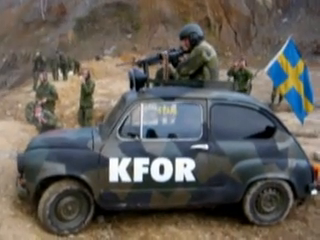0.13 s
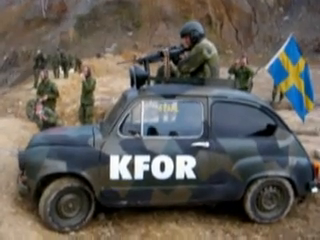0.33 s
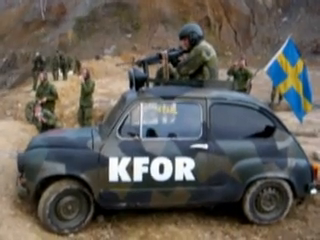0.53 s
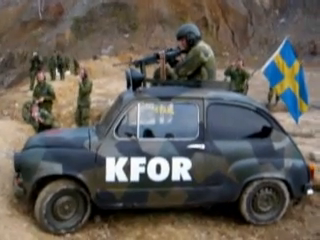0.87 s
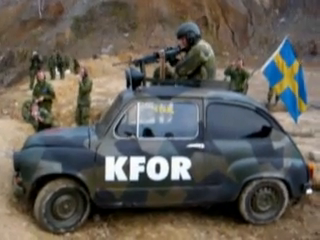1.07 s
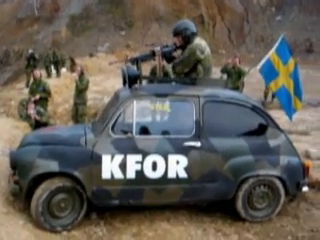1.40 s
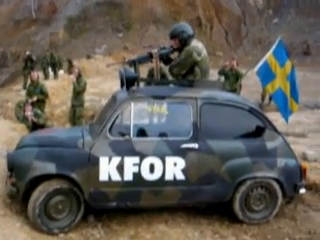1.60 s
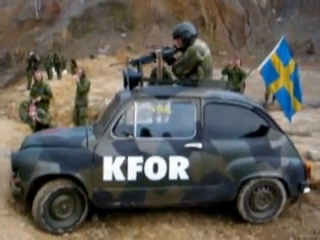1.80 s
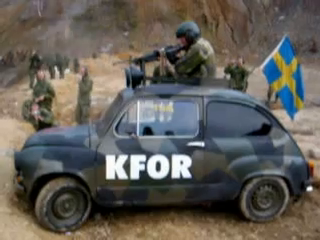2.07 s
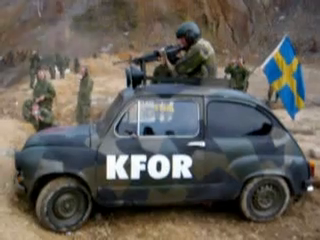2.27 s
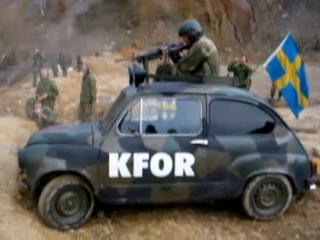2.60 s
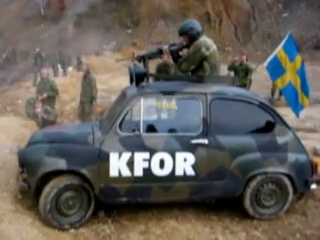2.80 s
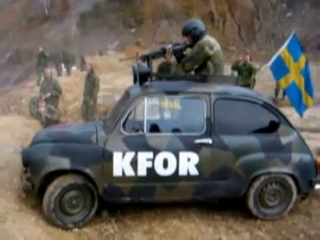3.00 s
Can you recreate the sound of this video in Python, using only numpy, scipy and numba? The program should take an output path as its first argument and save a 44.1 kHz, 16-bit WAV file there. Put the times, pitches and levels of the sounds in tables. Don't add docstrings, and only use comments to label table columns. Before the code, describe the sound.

Machine gun on a small car in a quarry: the echo of an earlier burst rolls and dulls, the bolt clatters home, then rapid close shots overload a pocket camera microphone until the end.

```python
import sys
import numpy as np
from scipy import signal
from scipy.io import wavfile
from scipy.ndimage import uniform_filter1d
from numba import njit

SR = 44100
rng = np.random.default_rng(int(sys.argv[2]) if len(sys.argv) > 2 else 0)


def generate_wav(sig):
    pcm = np.round(np.clip(np.atleast_2d(sig).T, -1, 1) * 32767).astype(np.int16)
    wavfile.write(sys.argv[1], SR, pcm)


def makeup_ratio(level_db):
    decades = np.asarray(level_db, float) / 20
    return 10 ** decades


N = 138474

# (time [s], blast level [dB], upward bias swing afterwards [rails])
SHOTS = [(2.0190, -2, 3.5), (2.0868, 1.5, 4.26), (2.1551, 3, 4.26), (2.2218, -1.5, 3.1),
         (2.2909, -1.5, 3.74), (2.3588, -6.5, 2.5), (2.4271, -4, 3.5), (2.4950, -1.5, 3.85),
         (2.5650, -2.5, 3.33), (2.6347, -5.5, 3.2), (2.7057, -2.5, 3.93), (2.7749, -2, 3.74),
         (2.8446, -2.5, 4.36), (2.9149, -4, 3.65), (2.9838, -2, 3.94), (3.0486, -3.5, 3.48),
         (3.1158, -2, 1.6)]
# (pitch [Hz], level [dB], time to fall 60 dB [s])
CAR_PANELS = [(158.6, 5, 0.13), (201, 8, 0.075), (257.8, 3.5, 0.065), (311.5, 5.5, 0.19), (396, 6, 0.11),
              (528, 4, 0.16), (658, 7.5, 0.12), (820, 6, 0.093), (902.3, 3, 0.12), (1015, -3, .1),
              (1327, -1, 0.08)]
# (delay [s], level [dB], length [s], polarity [+-])
BLAST_ECHOES = [(0, 16, .0003, -0.89), (.0003, 20, 0.00083, 1), (.0017, 23, 0.00059, 1),
                (.0037, 26, 0.00064, 1), (.0052, 25, 0.00097, 1), (.0074, 15.5, 0.00068, 1),
                (0.0107, 19, 0.00039, 0.87), (.013, 16.5, 0.0019, 1), (0.0169, 9.5, 0.0011, 1),
                (0.0212, 11.5, .0007, -1), (0.0224, 13, 0.00081, -1), (0.0251, 11.5, .0008, -1),
                (.03, 15.5, 0.00066, -1), (.0333, 8, 0.00052, -1), (0.0344, 6, 0.00059, -1),
                (.0408, 4.5, 0.0011, -1), (0.0454, -0.5, 0.0013, -1)]
# (time [s], level [dB])
BOLT_KNOCKS = [
    (1.969, -14.5),
    (1.9756, -8),
    (1.9899, -6),
    (2, -18),
    (2.0091, -2),
    (2.013, -19),
    (2.0135, -13),
]
# (pitch [Hz], width [Hz], level [dB])
BOLT_RINGS = [
    (2440, 1000, 5),
    (4000, 1000, -10),
    (5330, 940, 11),
]
# (time [s], level [dB], treble lost in air at 4 kHz [dB])
ROLLING_ECHO = [(0, -29.5, -8.5), (.12, -30, -9.5), (0.302, -25.5, -8.5), (.45, -20.5, -6),
                (.65, -19.5, -4.5), (.8, -17.5, 0), (.9, -20.5, -4), (1.2, -21.5, 3), (1.5, -23, 7.5),
                (1.749, -23.5, 14.5), (1.958, -28.5, 17.5), (2.098, -6, 9)]
# (pitch [Hz], level per Hz [dB])
ROLL_COLOUR = [(45, -14), (100, -4.5), (170, -2.5), (600, -4.5), (1400, -13), (2600, -12), (2950, -19.5),
               (6000, -38.5)]
# (time [s], pitch [Hz])
HOLLOW_PITCH = [(0, 822), (.5, 785), (.85, 734), (1.4, 575), (2, 525)]
# (time [s], pitch [Hz], level [dB])
FAR_SLAPS = [
    (0.542, 130, -6),
    (0.65, 228, -5.5),
    (0.709, 300, -5.5),
    (.789, 285, -2),
    (.830, 640, -8.5),
]
# (time [s], pitch [Hz], level [dB])
METAL_TICK = (0.79, 5600, -27.5)


@njit
def moving_band(x, hz, width):
    y, b, l = np.empty(len(x)), 0., 0.
    for i in range(len(x)):
        g, k = np.tan(np.pi * hz[i] / SR), width / hz[i]
        v = (b + g * (x[i] - l)) / (1 + g * (g + k))
        b, l, y[i] = 2 * v - b, l + 2 * g * v, k * v
    return y


def band(x, hz, width):
    y = moving_band(x, np.full(len(x), 1. * hz), 1. * width)
    return y / np.std(y)


def noise_band(n, hz, width):
    return band(rng.standard_normal(n), hz, width)


def fade(t, t60):
    return (t >= 0) * makeup_ratio(-60 * np.maximum(t, 0) / t60)


def wander(rate):
    hold = int(SR / rate)
    steps = np.repeat(rng.standard_normal(N // hold + 1), hold)
    return 0.9 * uniform_filter1d(uniform_filter1d(steps, hold), hold)[:N]


def repeat_at(times, sizes, sound):
    hits = np.zeros(N)
    np.add.at(hits, (np.asarray(times) * SR).astype(int), sizes)
    return signal.fftconvolve(hits, sound)[:N]


SCATTER_T60_S = 0.097


def blast(t):
    crack, panels = 0, 0
    for delay, db, length, sign in BLAST_ECHOES:
        half_wave = np.sin(np.pi * np.clip((t - delay) / length, 0, 1))
        crack = crack + sign * makeup_ratio(db) * half_wave
    for k, (hz, db, t60) in enumerate(CAR_PANELS):
        panels = panels + (-1) ** k * makeup_ratio(db) * np.sin(2 * np.pi * hz * t) * fade(t, t60)
    scatter = makeup_ratio(10) * noise_band(len(t), 2070, 2400) * fade(t, SCATTER_T60_S)
    low_scatter = makeup_ratio(6) * noise_band(len(t), 436, 500) * fade(t, 0.14)
    return crack + panels + scatter + low_scatter


def gun():
    when, db, overshoot = np.array(SHOTS).T
    t = np.arange(SR // 2) / SR
    gas = makeup_ratio(4) * noise_band(N, 2100, 2800) * repeat_at(when, makeup_ratio(db), fade(t, SCATTER_T60_S))

    kick, kick_s, overshoot_s = 13.8, 0.013, 0.045
    swing_down = kick * repeat_at(when, makeup_ratio(db), np.exp(-t / kick_s))
    bias = repeat_at(when, overshoot, np.exp(-t / overshoot_s)) - swing_down

    quarry_db, quarry_t60_s, quarry_hz = -21, 0.78, 1300
    long = np.arange(SR) / SR
    power = np.abs(repeat_at(when, 0.63, fade(long, quarry_t60_s) ** 2))
    quarry = makeup_ratio(quarry_db) * noise_band(N, quarry_hz / 2, quarry_hz) * np.sqrt(power)
    return repeat_at(when, makeup_ratio(db), blast(t)) + gas + bias + quarry


def bolt():
    lead_s, cycle_db, t60_s, rise_s = 0.018, -10.5, 0.036, 0.0024
    when, db = np.array(BOLT_KNOCKS).T
    when = np.r_[when, np.array(SHOTS)[1:, 0] - lead_s]
    db = np.r_[db, np.full(len(SHOTS) - 1, cycle_db)]
    t = np.arange(SR // 10) / SR
    rings = sum(makeup_ratio(level) * noise_band(N, hz, width) for hz, width, level in BOLT_RINGS)
    knock = fade(t, t60_s) * np.minimum(t / rise_s, 1) ** 2
    return rings / np.std(rings) * repeat_at(when, makeup_ratio(db), knock)


def far_slaps(t):
    slaps = 0
    for start, hz, db in FAR_SLAPS + [METAL_TICK]:
        slaps = slaps - makeup_ratio(db) * np.sin(2 * np.pi * hz * (t - start)) * fade(t - start, 0.016)
    return slaps


def hollow_tone(t):
    pitch = np.interp(t, *np.array(HOLLOW_PITCH).T)
    hollow = moving_band(rng.standard_normal(N), pitch, 350.)
    hollow = moving_band(hollow, pitch, 450.)
    return makeup_ratio(-6.5 + 1.1 * wander(22)) * hollow / np.std(hollow)


def rolling_echo():
    t = np.arange(N) / SR
    at, db, air_db = np.array(ROLLING_ECHO).T
    air_loss = np.interp(t, at, air_db)
    swell_db, flicker_db = 0.5, 0.87
    swell = wander(8.9)
    colour_hz, colour_db = np.array(ROLL_COLOUR).T
    rumble = 0
    for hz in 45 * 2 ** np.arange(0, 7.3, 1 / 4):
        colour = np.interp(np.log(hz), np.log(colour_hz), colour_db)
        colour = colour + 10 * np.log10(hz / 650)
        shift = -air_loss * (hz / 4000) ** 1.9
        shift = shift + swell_db * swell + flicker_db * wander(25)
        rumble = rumble + makeup_ratio(colour + shift) * band(noise_band(N, hz, hz / 4), hz, hz / 4)
    echo = rumble / 3 + hollow_tone(t)
    return echo * makeup_ratio(np.interp(t, at, db)) + far_slaps(t)


def wind_and_hiss():
    wind = makeup_ratio(-37 + 2.7 * wander(6)) * noise_band(N, 54, 68)
    return wind + makeup_ratio(-51.5) * noise_band(N, 5000, 4000)


def scene():
    return (gun() + bolt() + rolling_echo() + wind_and_hiss())[None]


def low_pass(x):
    return signal.sosfilt(signal.butter(12, 6880, fs=SR, output="sos"), x)


def record(dry):
    t = np.arange(N) / SR
    since = np.maximum(t - SHOTS[0][0], 0)

    softness = 0.17
    x = (np.hypot(dry + 1, softness) - np.hypot(dry - 1, softness)) / 2
    for hz in (97, 44.6):
        x = signal.lfilter(*signal.butter(1, hz, "high", fs=SR), x)

    open_db, ducked_db, duck_s = -2, -11, 0.023
    x = x * makeup_ratio(ducked_db + (open_db - ducked_db) * np.exp(-since / duck_s))
    x = signal.sosfilt(signal.butter(4, 6000, fs=SR, output="sos"), x)
    x = signal.sosfilt(signal.cheby2(6, 50, 8280, fs=SR, output="sos"), x)

    start, rest, fall_s, climb, rise_s = 0.215, -0.085, 0.78, 0.27, 0.3
    drift = rest + (start - rest) * np.exp(-t / fall_s)
    drift = drift + climb * (1 - np.exp(-since / rise_s))
    ripple = makeup_ratio(-43) * signal.sawtooth(2 * np.pi * 32.4 * t, 0.8)
    ripple = uniform_filter1d(ripple, size=200)
    return low_pass(np.clip(x + drift + ripple, -0.976, 0.976))


dry = scene()
out = record(dry)
generate_wav(out)
```